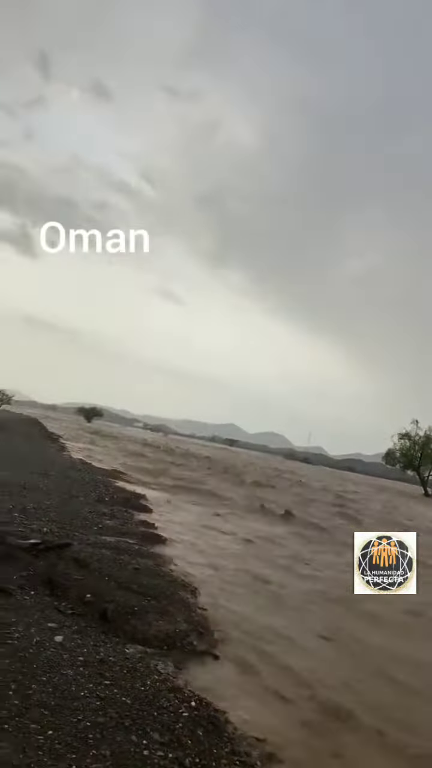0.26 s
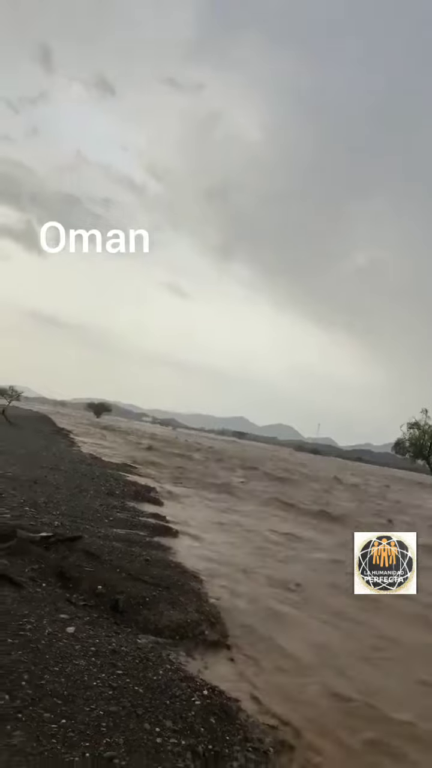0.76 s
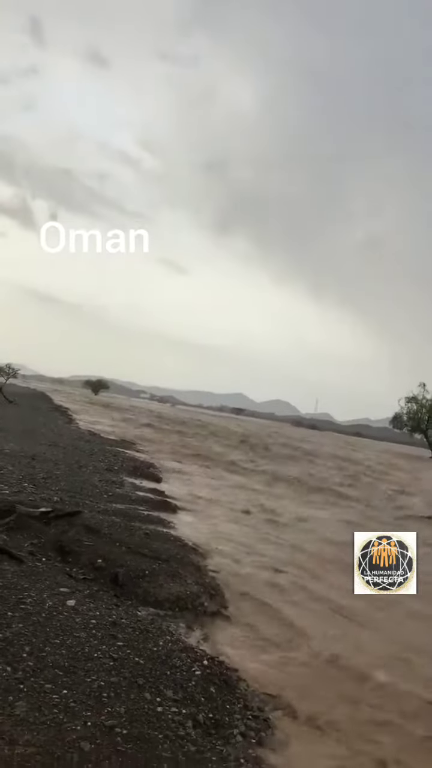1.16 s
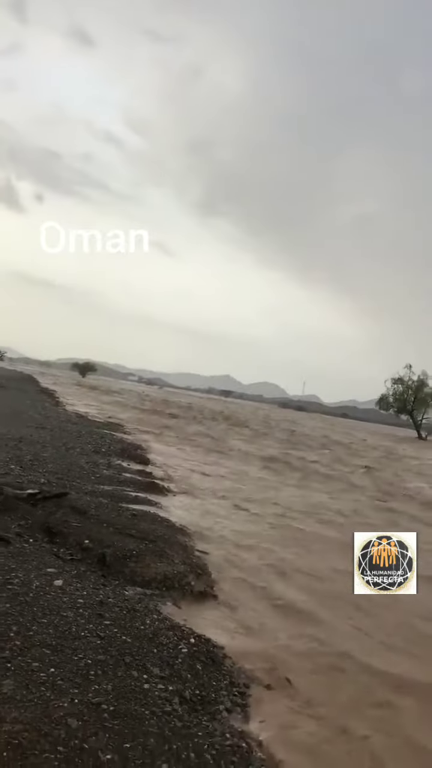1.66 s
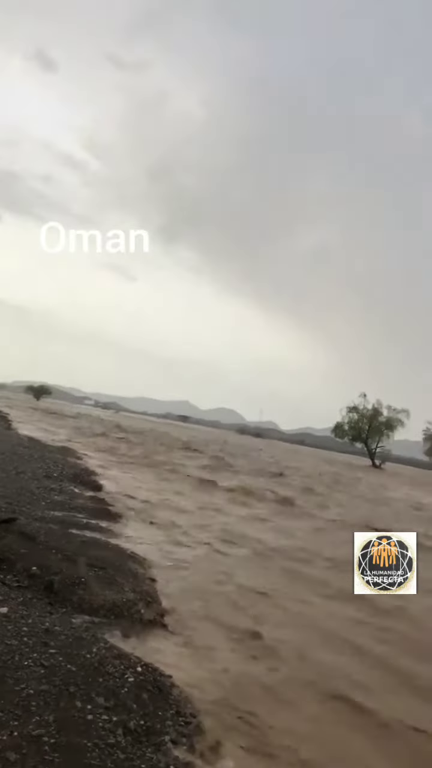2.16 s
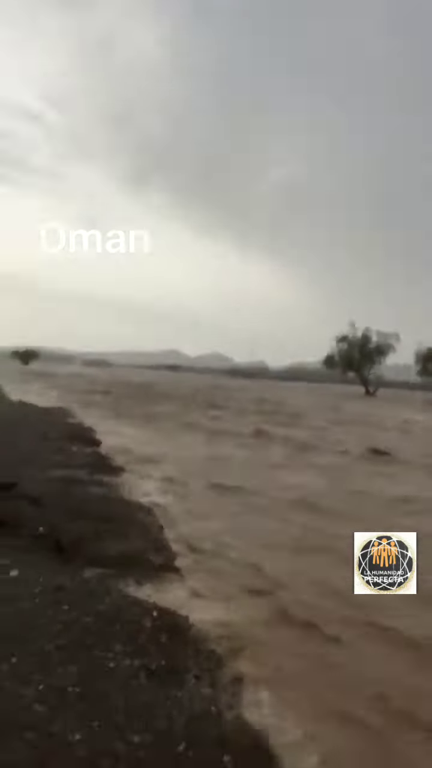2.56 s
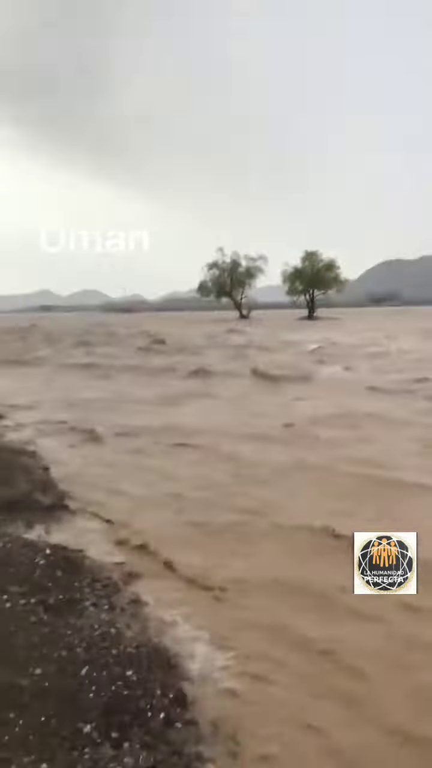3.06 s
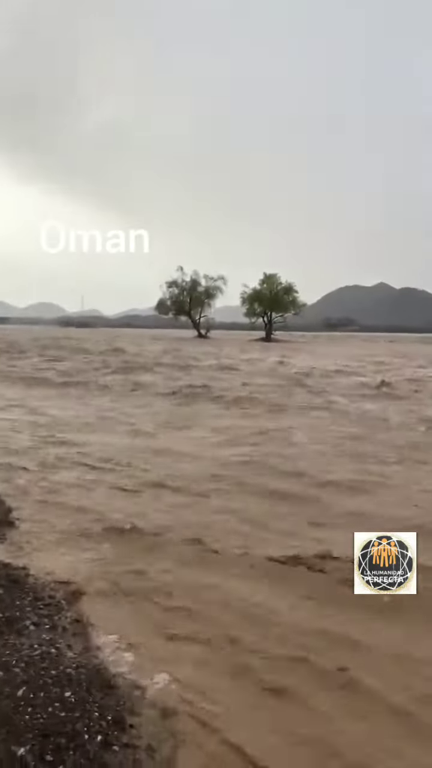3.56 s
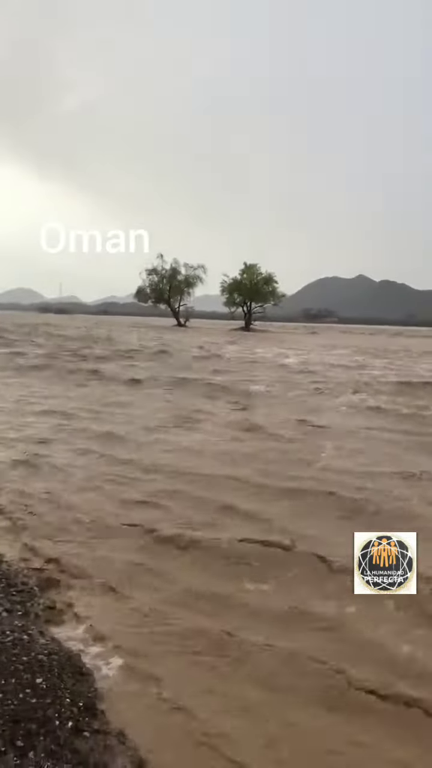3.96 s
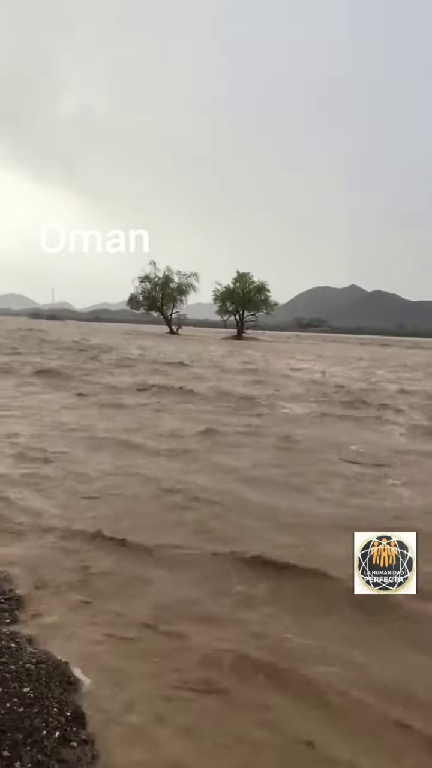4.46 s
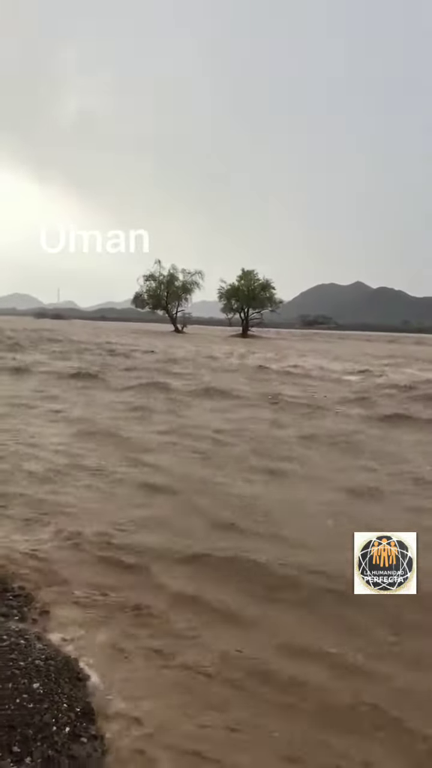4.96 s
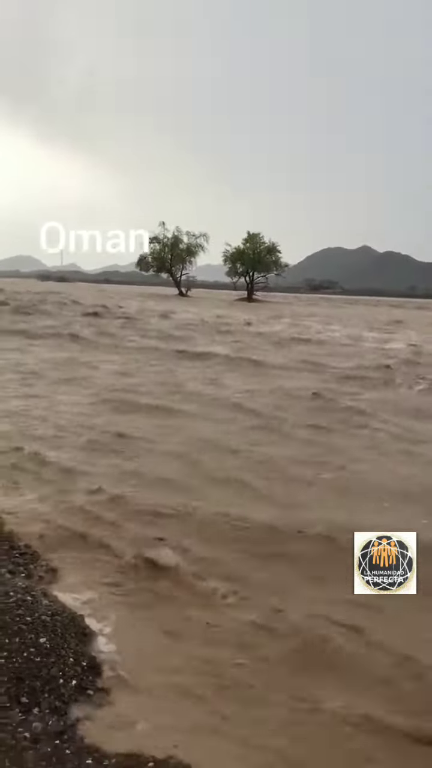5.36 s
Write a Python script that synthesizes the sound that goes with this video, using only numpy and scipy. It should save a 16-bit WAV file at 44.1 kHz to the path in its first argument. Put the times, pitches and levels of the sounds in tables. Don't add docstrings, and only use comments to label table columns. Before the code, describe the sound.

A broad, churning river roar with fine rain hiss, gusty low rumble at first, then scattered sharp drop ticks and deep plops.

```python
import sys
import numpy as np
from scipy import signal
from scipy.fft import rfft, irfft
from scipy.io import wavfile
from scipy.ndimage import uniform_filter1d

SR = 44100
rng = np.random.default_rng(int(sys.argv[2]) if len(sys.argv) > 2 else 0)


def store_pcm(level_fs):
    pcm = np.round(np.clip(level_fs, -1, 1) * 32767).astype(np.int16)
    wavfile.write(sys.argv[1], SR, np.atleast_2d(pcm).T)


def amplitude_ratio(level_db):
    exponent = np.asarray(level_db, float) / 20
    return 10 ** exponent


N = 247842

# pitch in Hz, level in dB.
DEEP_ROAR_TONE = [(18, -38), (35, -3.5), (70, 4), (120, -9), (220, -30)]
# pitch in Hz, level in dB.
FLOOD_TONE = [(150, -45), (250, -25), (338, -8), (399, -5), (565, -1), (660, 2), (807, -7), (1230, -29.5),
              (1780, -20.5), (2630, -17.5), (3290, -35), (3600, -31.5), (4680, -41.5), (7920, -120)]
# pitch in Hz, level in dB.
RAIN_TONE = [(1940, -39), (3300, -26.5), (3920, 1), (4530, 1), (9310, 5), (15100, -5.5), (16000, -18)]
# time in seconds, level in dB.
RAIN_STRENGTH = [(0.0, -52), (0.801, -51), (1.35, -50), (1.8, -51), (2.7, -52), (2.9, -53), (4.1, -52),
                 (5.62, -52)]
# pitch in Hz, level in dB.
WIND_TONE = [(25, -38), (45, -8.5), (70, 1.5), (160, -1), (320, -7), (600, -23), (1000, -36)]
# time in seconds, level in dB.
WIND_STRENGTH = [(0.0, -30), (0.12, -31), (0.3, -41.5), (0.74, -36.5), (1.0, -36.5), (1.24, -37),
                 (1.44, -31.5), (1.61, -39), (2.47, -40), (2.9, -44.5), (3.05, -43), (3.35, -46),
                 (4.32, -45), (5.62, -45)]
# pitch in Hz, level in dB.
RIM_TONE = [(300, -47), (500, -1), (900, -1.5), (1300, -8), (2000, -9), (3000, -46), (3600, -50)]
# pitch in Hz, width in Hz, level in dB.
COVER_BODY = [(691, 70, -8.5), (898, 270, -3)]
# pitch in Hz, width in Hz, level in dB.
COVER_SNAP = [(1620, 720, 2), (2700, 210, 10)]
# pitch in Hz, width in Hz, level in dB.
COVER_FLEX = [(70, 21, 9), (150, 150, 1)]
# start in seconds, peak level in dB, pitch in Hz.
AIR_SPLASHES = [(0.2321, -16, 6900), (0.396, -36, 7100), (0.5332, -39, 9340), (0.599, -32.5, 4600),
                (1.1513, -33, 10100), (1.1738, -30, 7350), (1.3055, -20, 4750), (1.9004, -38, 8260),
                (2.4874, -40, 9700), (2.9667, -42, 5750), (3.0354, -43, 7470), (3.073, -33, 7740),
                (3.2695, -35, 9570), (3.345, -41, 4540), (3.5713, -40, 6140), (3.8003, -38, 9040),
                (4.9725, -36, 5120), (4.986, -36, 6870)]
# start in seconds, peak level in dB.
GUST_SLAPS = [(.172, -26), (.315, -22.5), (0.329, -22.5), (0.489, -17), (0.5, -17.5), (0.62, -22),
              (.775, -20), (1.25, -19), (1.347, -20.5), (1.552, -18.5), (1.57, -20.5), (1.606, -19.5),
              (2.543, -25)]
# start in seconds, peak level in dB, top pitch in Hz, delay of each tone in cycles.
HEAVY_THUDS = [
    (0.241, -21, 200, 0.73),
    (2.146, -13.5, 412, 0.62),
    (2.166, -23.5, 150, 0.46),
    (2.969, -7, 436, 0.837),
    (2.998, -22.5, 300, 0.8),
    (3.573, -30, 400, .9),
    (4.656, -10, 454, 1.206),
    (4.691, -27, 300, .8),
    (4.761, -31, 201, 0.84),
    (4.988, -31, 400, 1.05),
]
# start in seconds, peak level of the snap in dB, softness in dB.
SMALL_DROPS = [(0.2712, -45, 13), (0.395, -32, -11), (0.4184, -40.5, 10), (0.4998, -34, 4.5),
               (0.7706, -31.5, 2), (0.9096, -34.5, 4.5), (1.3359, -31.5, -14), (1.4234, -40.5, 14),
               (1.4944, -47, 21.5), (1.5254, -43.5, 13.5), (1.6681, -35.5, 2), (1.9334, -41, 9.5),
               (2.0237, -32, 3), (2.143, -39.5, 26), (2.151, -44, 22.5), (2.3034, -44, 12.5),
               (2.809, -34, -7.5), (2.924, -32, -18), (2.9981, -44.5, 13), (3.2382, -36.5, -5),
               (3.612, -39, 1), (3.6163, -30, 5.5), (4.482, -31, -15), (4.6549, -38, 17), (4.69, -46, 12),
               (4.7364, -31.5, -22), (4.8395, -39.5, 17.5), (5.037, -51, 8), (5.3527, -33.5, -1.5),
               (5.6096, -35, -3)]
# start in seconds, peak level of the snap in dB, pitch of the snap in Hz,
# softness in dB, knock in dB compared with the snap.
BIG_DROPS = [(0.0918, -31, 2090, 11, 10.5), (0.1005, -17, 2190, 9.5, -7), (0.2323, -6, 2800, -9.5, -10.5),
             (0.5995, -25, 2390, -23, -16), (1.2271, -29.5, 2390, -1, -25),
             (1.3051, -6.5, 2650, -11.5, -13), (1.8537, -25.5, 2620, -25, -17),
             (1.9012, -21, 2600, -0.5, -13), (2.1263, -22, 2960, -0.5, -7.5), (2.4877, -28, 2200, -20, -17),
             (2.853, -14, 2400, 0, -8), (2.9675, -15.5, 2600, -8.5, -18), (2.9738, -33, 2230, 6.5, 1),
             (3.036, -32, 3250, 2.5, -2), (3.0728, -16, 2700, -6.5, -10.5), (3.511, -30.5, 2230, 3, -14),
             (3.5204, -40, 2330, 11, 5), (3.571, -18, 2990, 0, -18), (4.0502, -29, 2400, 4.5, -20),
             (4.679, -22, 2400, -1.5, -11.5), (4.972, -32.5, 2390, -7, -2.5),
             (4.9867, -15.5, 2820, 5.5, -10.5), (5.3245, -27.5, 2700, -7.5, -25),
             (5.3757, -20, 2960, -21, -15)]

GRAIN = 8192
TURN_S, TURN_LENGTH_S = 2.28, 0.35


def unit(x):
    return x / np.sqrt(np.mean(x ** 2))


def colour(x, table):
    hz, db = np.transpose(table)
    f = np.maximum(np.fft.rfftfreq(len(x), 1 / SR), 1)
    tone_db = np.interp(np.log(f), np.log(hz), db, left=-90, right=-90)
    return unit(irfft(rfft(x) * amplitude_ratio(tone_db), len(x)))


def walk(rate):
    hold = int(SR / rate)
    steps = np.repeat(rng.standard_normal(N // hold + 1), hold)
    smooth = uniform_filter1d(uniform_filter1d(steps, hold), hold)
    return unit(smooth[:N])


def patter(rate, scatter_db):
    chance, sign, size = rng.random((N, 3)).T
    height = amplitude_ratio(-scatter_db * np.log(size + 0.0087))
    return (chance < rate / SR) * np.sign(sign - 0.5) * height


def flutter(table, rate, depth_db, grains, scatter_db, share):
    clicks = unit(patter(grains, scatter_db))
    source = colour(clicks * share + rng.standard_normal(N), table)
    spectrum = rfft(source)
    pitch = np.log2(np.maximum(np.fft.rfftfreq(N, 1 / SR), 1))
    swell = walk(rate)
    out = np.zeros(N)
    for octave in range(4, 15):
        window = np.cos(np.clip(pitch - octave, -1, 1) * np.pi / 2) ** 2
        part = irfft(spectrum * window, N)
        flicker = 0.74 * swell + 0.86 * walk(rate * 1.8)
        out += part * amplitude_ratio(depth_db * flicker)
    return unit(out)


def grain_pitches():
    return np.fft.rfftfreq(GRAIN, 1 / SR)


def modes(f, table):
    return sum(amplitude_ratio(db) * 1j * f * w / (hz ** 2 - f ** 2 + 1j * f * w) for hz, w, db in table)


def steep_mode(f, hz, width):
    return modes(f, [(hz, width, 0)]) ** 2


def lowpass(f, hz, order):
    return 1 / (1 - (f / hz) ** 2 + 1.1j * f / hz) ** order


def splat(spectrum, f, turns):
    phase = turns * np.log(f / 4150 + 1e-9) * (f < 4000)
    wave = irfft(spectrum * np.exp(-2j * np.pi * phase), GRAIN)
    return wave / np.abs(wave).max()


def add(out, s, wave):
    i = int(s * SR)
    out[i:i + len(wave)] += wave[:len(out) - i]


def flood(turned):
    rush = amplitude_ratio(-36.5 - 0.5 * turned) * flutter(FLOOD_TONE, 18, 1.36, 600, 3.4, 0.38)
    roar = amplitude_ratio(-46.5) * flutter(DEEP_ROAR_TONE, 11, 1.2, 50, 3.3, 0.29)
    return rush + roar


def rain_hiss(t):
    rain_db = np.interp(t, *np.transpose(RAIN_STRENGTH))
    return amplitude_ratio(rain_db + 0.8) * flutter(RAIN_TONE, 45, 0.8, 800, 3, 0.45)


def wind_buffet(wind_db):
    return amplitude_ratio(wind_db + 2.5) * flutter(WIND_TONE, 22, 2.4, 150, 0.98, 0.37)


def spray_slaps():
    f = grain_pitches()
    dull = lowpass(f, 1220, order=2) * 1j * f / (165 + 1j * f) / (110 + f) ** 0.68
    chirp = splat(dull, f, 0.907)
    slaps = patter(170, 2.8) * amplitude_ratio(2.5 * walk(16))
    return unit(signal.fftconvolve(slaps, chirp)[:N])


def rim(wind_db, turned):
    rim_db = -39.5 + 0.39 * (wind_db + 39) - 14.5 * turned
    whistle = amplitude_ratio(rim_db - 6) * flutter(RIM_TONE, 24.67, 0.97, 200, 1.1, 0.94)
    return whistle + amplitude_ratio(rim_db + 2.5) * spray_slaps()


def drizzle():
    f = grain_pitches()
    ringing = modes(f, COVER_SNAP) + amplitude_ratio(-18) * modes(f, COVER_BODY)
    chirp = splat(ringing * lowpass(f, 2500, order=3), f, 1.32)
    return amplitude_ratio(-57) * unit(signal.fftconvolve(patter(45, 1.4), chirp)[:N])


def air_splashes():
    out, f = np.zeros(N), grain_pitches()
    for s, db, hz in AIR_SPLASHES:
        splash = steep_mode(f, hz, 0.91 * hz) * lowpass(f, 11000, order=2)
        add(out, s, amplitude_ratio(db + 9) * splat(splash, f, 0))
    return out


def cover_bends():
    out, f = np.zeros(N), grain_pitches()
    gusts = [(s, db, 315, 0.555) for s, db in GUST_SLAPS]
    for s, db, hz, turns in HEAVY_THUDS + gusts:
        flex = (0.87 + modes(f, COVER_FLEX)) * lowpass(f, 1.19 * hz, order=2)
        rumble_cut = (1j * f / (41 + 1j * f)) ** 3
        thud = amplitude_ratio(db) * splat(flex * rumble_cut / (60 + f) ** 0.5, f, turns)
        add(out, s, thud)
        for sign in (1, -1):
            late_s = 0.00676 + 0.033 * rng.random()
            weaker_db = -18 - 7.2 * rng.random()
            add(out, s + late_s, sign * amplitude_ratio(weaker_db) * thud)
    return out


def cover_drops():
    out, f = np.zeros(N), grain_pitches()
    damping = lowpass(f, 3670, order=3)
    small = []
    for s, db, soft_db in SMALL_DROPS:
        snap_hz = 2540 * (1 + 0.06 * rng.standard_normal())
        small.append((s, db, snap_hz, soft_db, -11.5 + 0.55 * soft_db))
    for s, db, snap_hz, soft_db, knock_db in BIG_DROPS + small:
        turns = np.clip(0.55 + 0.04 * soft_db, 0.15, 1.2)
        snap = splat(steep_mode(f, snap_hz, 850) * damping, f, turns)
        knock = -splat(steep_mode(f, 1600, 520) * damping, f, turns)
        ring = splat(steep_mode(f, 990, 250) * damping, f, turns)
        body = -splat(steep_mode(f, 620, 220) * damping, f, turns)
        ring_db = -0.5 + 0.82 * soft_db
        blow = snap + amplitude_ratio(knock_db + 5.5) * knock
        blow = blow + amplitude_ratio(ring_db + 1) * ring + amplitude_ratio(soft_db + 3) * body
        add(out, s, amplitude_ratio(db) * blow)
    return out


def scene():
    t = np.arange(N) / SR
    wind_db = np.interp(t, *np.transpose(WIND_STRENGTH))
    turned = 0.5 + 0.5 * np.tanh((t - TURN_S) / TURN_LENGTH_S)
    background = flood(turned) + rain_hiss(t) + wind_buffet(wind_db) + rim(wind_db, turned)
    on_cover = drizzle() + air_splashes() + cover_bends() + cover_drops()
    return (background + on_cover)[None]


def roll_off(x):
    return signal.sosfilt(signal.butter(12, 16800, fs=SR, output="sos"), x)


def record(dry):
    rounded = np.tanh(1.1 * dry) / 1.1
    treble_cut = signal.ellip(8, 0.2, 60, 16000, fs=SR, output="sos")
    mix = signal.sosfilt(treble_cut, rounded)
    return roll_off(mix)


dry = scene()
out = record(dry)
store_pcm(out)
```